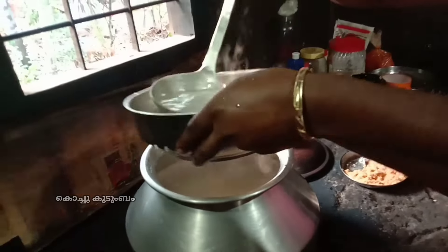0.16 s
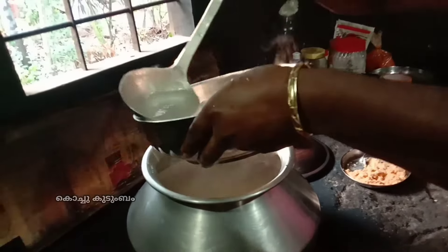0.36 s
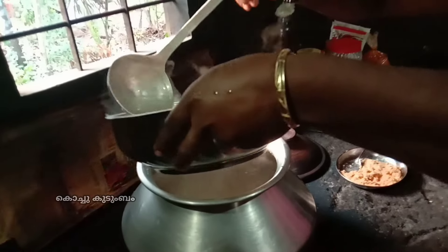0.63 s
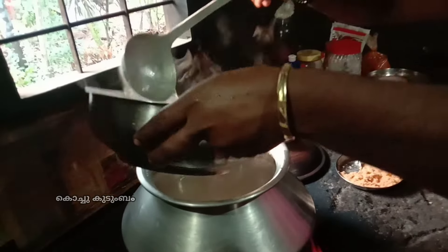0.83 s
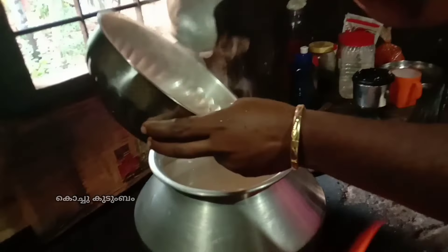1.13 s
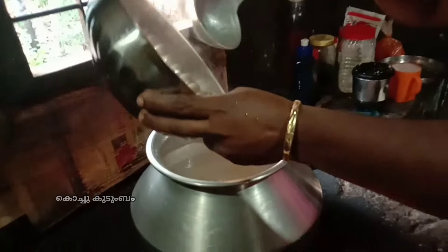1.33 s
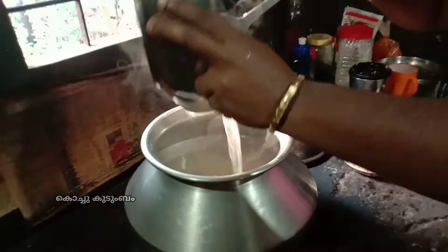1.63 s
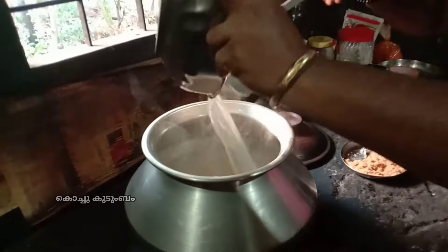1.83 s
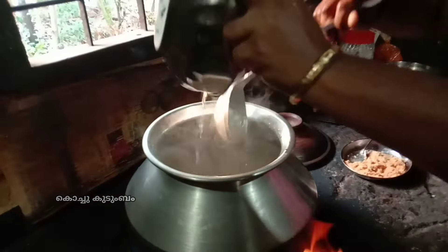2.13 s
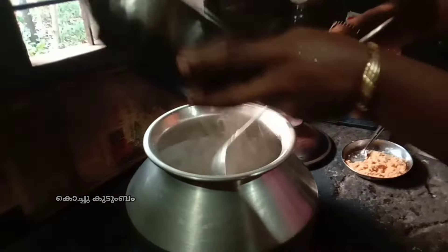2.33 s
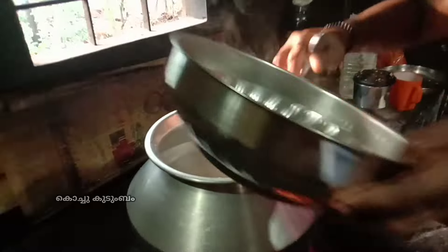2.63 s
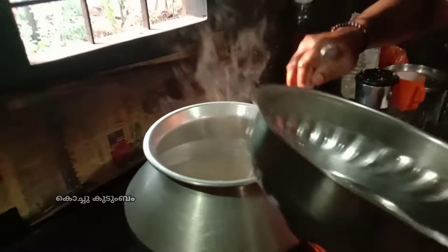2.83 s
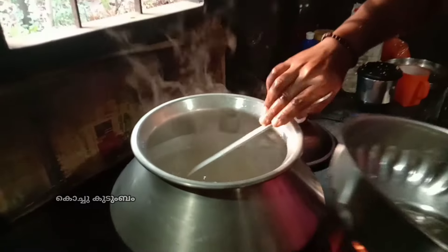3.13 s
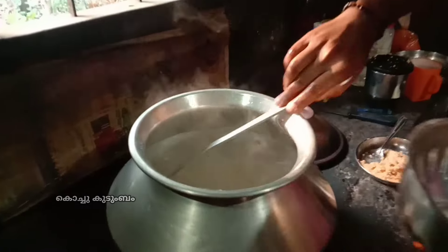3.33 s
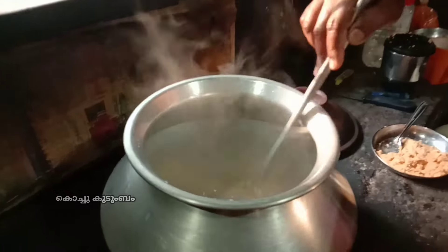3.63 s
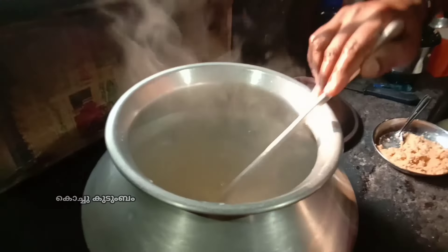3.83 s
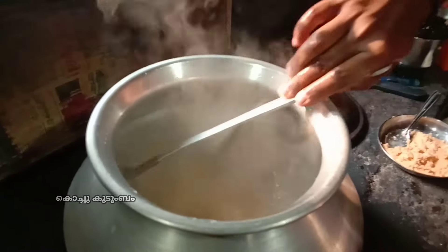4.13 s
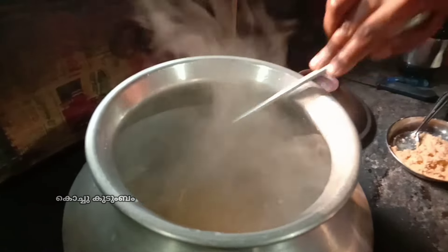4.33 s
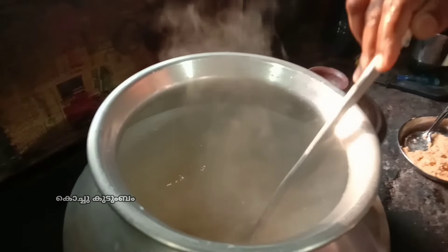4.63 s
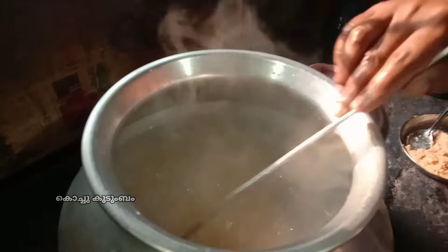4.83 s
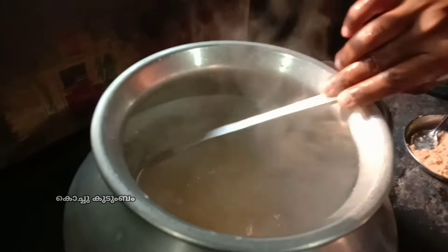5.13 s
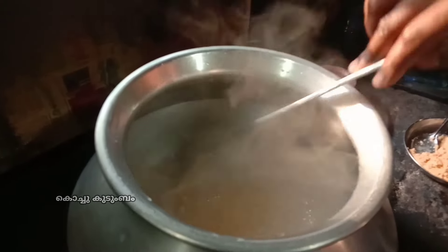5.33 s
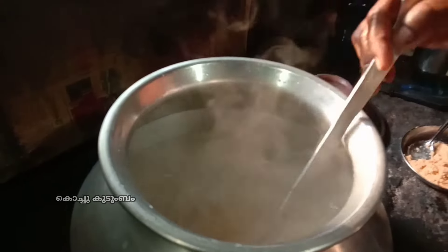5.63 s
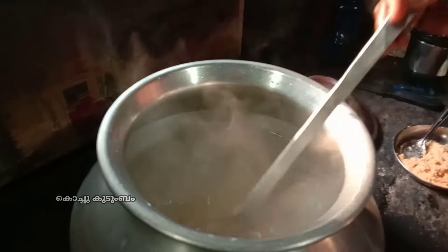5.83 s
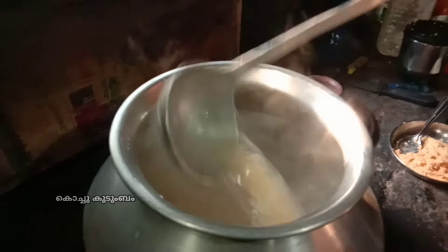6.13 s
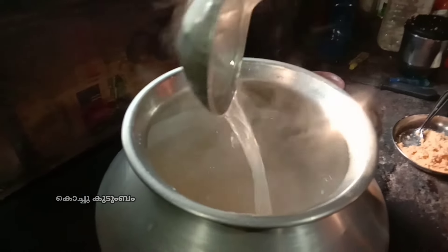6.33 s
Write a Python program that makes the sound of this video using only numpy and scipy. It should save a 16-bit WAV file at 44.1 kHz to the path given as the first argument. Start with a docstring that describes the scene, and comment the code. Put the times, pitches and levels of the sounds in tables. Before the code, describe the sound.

In a small kitchen, poured water splashes into a hollow metal pot, followed by a bright bowl clang and three gritty ladle scrapes through sloshing water.

```python
"""In a small kitchen, water is ladled into a steel bowl and tipped into a big metal pot of rice and hot water.
The bowl clangs as it is drawn away. A long ladle then stirs the pot: it sloshes, knocks on the wall,
scrapes three times round the bottom through the rice, and lifts a scoop that runs back in.
Water is built from swarms of ringing bubbles, random ticks and fine spray; metal from decaying modes
and coloured noise bursts. Echoes inside the pot and the tail of the room surround most layers."""
import sys
import numpy as np
from scipy import signal
from scipy.io import wavfile
from scipy.ndimage import uniform_filter1d, map_coordinates

SR = 44100
rng = np.random.default_rng(int(sys.argv[2]) if len(sys.argv) > 2 else 0)


def digitize_waveform(pressure):
    """Quantize a signal to 16-bit integers and store it at the path in sys.argv[1].

    Rows of a 2-D input are taken as channels; values are limited to [-1, 1].
    """
    field = np.atleast_2d(pressure).T
    bounded = np.clip(field, -1, 1)
    quanta = np.round(bounded * 32767).astype(np.int16)
    wavfile.write(sys.argv[1], SR, quanta)


N = 285327
TIME = np.arange(N) / SR
EMPTIED_S = 1.3  # before this the bowl holds water; after it, water falls in the pot


def amp(db):
    """Decibels to linear gain."""
    return 10 ** (np.asarray(db) / 20)


def evened(x):
    """Scales a sound to unit power."""
    return x / np.sqrt(np.mean(x ** 2) + 1e-20)


def read(points, hz):
    """Reads a curve of (frequency, value) points along a logarithmic frequency axis."""
    f, value = np.transpose(points)
    return np.interp(np.log(hz + 1), np.log(f + 1), value)


def add(mix, start_s, sound):
    """Lays a sound into the mix, cut off at the end."""
    part = mix[max(round(start_s * SR), 0):][:len(sound)]
    part += sound[:len(part)]


def seconds(length):
    """Time axis of a short sound."""
    return np.arange(int(length * SR)) / SR


def through(x, response):
    """Convolves a sound with a response and keeps its length."""
    return signal.fftconvolve(x, response)[:len(x)]


def colour(x, spectrum):
    """Causal minimum-phase filter with the given spectrum."""
    hz = abs(np.fft.fftfreq(4096, 1 / SR))
    log_gain = np.log(amp(read(spectrum, hz)))
    response = np.fft.ifft(np.exp(np.conj(signal.hilbert(log_gain)))).real
    return through(x, response[:2048])


def crest(x):
    """Scales a hit so that its loudest 5 ms have unit power."""
    return x / np.sqrt(uniform_filter1d(x ** 2, size=220).max() + 1e-20)


def steady(x, span):
    """Evens out the slow drift of a texture over span seconds and keeps its grain."""
    window = signal.windows.hann(int(span * SR))
    power = signal.fftconvolve(x ** 2, window, "same") / (span * SR / 2)
    return x / np.sqrt(abs(power) + .02 * np.mean(x ** 2))


def wander(per_s):
    """Smooth random drift of about unit size, through per_s random points a second."""
    knots = rng.standard_normal(int(N / SR * 400))
    return map_coordinates(knots, [TIME * per_s], order=2, mode="mirror")


def ringing(modes):
    """Unit-energy answer of a set of modes to one tap; no mode decays slower than 60 dB in 1 s."""
    t = seconds(1)
    out = 0
    for hz, db, t60 in modes:
        decay = amp(db - 60 * t / min(t60, 1))
        out = out + decay * np.sin(2 * np.pi * (hz * t + rng.random()))
    return out / np.linalg.norm(out)


def patter(per_s, spread_db):
    """Random clicks, most of them small and a few large."""
    out = np.zeros(N)
    at = np.flatnonzero(rng.random(N) < per_s / SR)
    draw = rng.uniform(-1, 1, N)[at]
    out[at] = np.sign(draw) * amp(spread_db * np.minimum(-np.log(abs(draw)), 4))
    return out


def bubble(hz, cycles, rise):
    """A bubble rings for some cycles and climbs in pitch as it nears the surface."""
    life = cycles / hz
    t = seconds(5 * life)
    tone = np.sin(2 * np.pi * hz * (t + rise * t * t / (2 * life)))
    return tone * np.exp(-t / life) * (1 - np.exp(-2 * t * hz))


def bubbles(low_hz, high_hz, per_s, spread_db, cycles, rise, count=36):
    """A swarm of bubbles of all sizes; small, high-pitched ones are more common."""
    pitches = np.geomspace(low_hz, high_hz, count) * rng.uniform(.97, 1.03, count)
    shares = np.sqrt(pitches) / np.sqrt(pitches).sum()
    out = np.zeros(N)
    for hz, share in zip(pitches, shares):
        shape = hz / np.sqrt(share) * bubble(hz, cycles * rng.uniform(.5, 1.5), rise)
        out += signal.oaconvolve(patter(per_s * share, spread_db), shape)[:N]
    return evened(out)


def gesture(start, length, rise_s, fall_db_per_s, depth_db=18, sag_db_per_s=0):
    """Gain of one movement: it swells from depth_db down, holds or sags, then dies away."""
    t = TIME - start
    swell = depth_db * np.maximum(1 - t / rise_s, 0)
    sag = sag_db_per_s * np.maximum(t - rise_s, 0)
    fall = fall_db_per_s * np.maximum(t - length, 0)
    return np.clip(t / .004, 0, 1) * amp(-swell - sag - fall)


def gestures(rows, rise_s, fall_db_per_s, **shape):
    """One gain curve for each dB column of a table of movements; overlaps add in power."""
    gains = []
    for start, length, *dbs in rows:
        gains.append(np.outer(amp(dbs), gesture(start, length, rise_s, fall_db_per_s, **shape)))
    return np.linalg.norm(gains, axis=0)


# Decay of the room's tail: frequency_hz, t60_s
ROOM_DECAY = [(100, 1), (400, 0.23), (1500, 0.48), (4000, 0.34), (8000, 0.44), (15000, 0.052)]


def kitchen(early_t60, early_db, late_db):
    """Direct sound, quick echoes inside the pot and off the near wall, then the tail of the room."""
    t = seconds(.6)
    early, late = rng.standard_normal((2, len(t))) * (rng.random((2, len(t))) < .15)
    early *= amp(-60 * t / early_t60) * (t > .001)
    # the tail dies at its own rate in each frequency band
    hz, at, bands = signal.stft(late * (t > .008), SR, nperseg=256)
    fading = bands * amp(-60 * at / read(ROOM_DECAY, hz)[:, None])
    late = signal.istft(fading, SR, nperseg=256)[1][:len(t)]
    out = amp(early_db) * early / np.linalg.norm(early) + amp(late_db) * late / np.linalg.norm(late)
    out[0] += 1
    return out / np.linalg.norm(out)


def roaming(x, rooms):
    """A source that travels round the pot meets ever different echoes."""
    weights = amp(10 * np.array([wander(per_s=9) for _ in rooms]))
    weights /= np.linalg.norm(weights, axis=0)
    return sum(w * through(x, room) for w, room in zip(weights, rooms))


# Colour of the kitchen's background: frequency_hz, relative_density_db
AIR_COLOUR = [(20, -30), (50, 2.5), (75, -5), (120, 2.5), (180, -12), (400, -6.5), (520, -9), (700, -23),
              (1300, -18.5), (5000, -23.5), (7200, -12), (9000, -29.5), (13000, -45), (15200, -20.5)]


def kitchen_air():
    """Steady noise of the kitchen, coloured by its spectrum."""
    return amp(-55) * evened(colour(rng.standard_normal(N), AIR_COLOUR))


# Dull bumps of the bowl as it is handled: start_s, level_db, pitch_hz
BOWL_BUMPS = [(0.491, -57, 114), (0.894, -51, 111), (1.32, -51, 117), (2.771, -36, 126.5)]


def bumping():
    """A soft blow gives only a short low note."""
    out = np.zeros(N)
    t = seconds(.4)
    for start_s, level_db, pitch_hz in BOWL_BUMPS:
        note = np.sin(2 * np.pi * pitch_hz * t) * t * np.exp(-t / 0.017)
        add(out, start_s, amp(level_db) * crest(note))
    return out


# Colour of fine spray and of the top edge of a hit: frequency_hz, relative_density_db
SPRAY_COLOUR = [(6000, -29.5), (8700, -5), (10500, -3.5), (13500, -13), (15000, 0.5), (16000, 2)]


def mist(room):
    """Fine droplets tick at the top of the range."""
    droplets = patter(per_s=300, spread_db=7.5)
    return steady(through(colour(droplets, SPRAY_COLOUR), room), span=0.11)


# Single drops and slaps of water: start_s, level_db (before the layer trim), starting pitch_hz
WATER_DROPS = [(0.5724, -12, 6100), (0.6406, -17.5, 1810), (0.718, -15, 2310), (0.7553, -16.5, 3110),
               (1.6213, -20.5, 6740), (1.804, -9.5, 2930), (1.8853, -14.5, 4120), (2.0528, -13, 1656),
               (2.0678, -8.5, 2990), (2.319, -24, 7160), (2.4058, -27, 7180), (2.442, -24, 4730),
               (2.4616, -24, 4430), (2.5048, -26.5, 4050), (2.5613, -28.5, 6040), (3.0188, -16, 2400),
               (3.188, -19.5, 1670), (3.923, -11.5, 2400), (3.9655, -11.5, 2920), (4.0345, -15.5, 3660),
               (5.739, -14.5, 5400), (5.7991, -10.5, 5920), (5.9875, -18, 2900), (6.063, -13.5, 6130),
               (6.263, -20, 2330), (6.4502, -7.5, 3870)]
# Colour of splashing water: frequency_hz, relative_density_db
SPLASH_COLOUR = [(150, -23), (450, -9), (700, -14.5), (1000, -13), (1350, -7), (2200, -5), (3100, -2),
                 (4500, -5.5), (6300, -5.5), (7300, 0), (8300, -9), (10000, -22.5), (14000, -40)]


def dripping(room):
    """A drop slaps the surface and leaves one ringing bubble, with a few smaller ones in its wake."""
    out = np.zeros(N)
    t = seconds(.4)
    for start_s, level_db, pitch_hz in WATER_DROPS:
        impact = rng.standard_normal(len(t)) * np.exp(-t / 0.0035)
        drop = crest(colour(impact, SPLASH_COLOUR)) + amp(-17) * crest(colour(impact, SPRAY_COLOUR))
        add(drop, .001, amp(7.0) * crest(bubble(pitch_hz, cycles=13.0, rise=0.019)))
        for delay, ratio in rng.uniform([.003, .75], [.025, 1.25], (3, 2)):
            add(drop, delay, amp(-8.5) * crest(bubble(pitch_hz * ratio, cycles=3.1, rise=0.04)))
        add(out, start_s, amp(level_db) * crest(through(drop, room)))
    return amp(-14) * out


# Big air pockets closing under the surface: start_s, level_db (before trim), nominal pitch_hz
AIR_GULPS = [(0.152, -40.5, 343), (0.239, -28, 315), (1.664, -22.5, 354), (1.82, -27, 374),
             (1.905, -27, 390), (1.939, -25.5, 367), (3.634, -20.5, 370), (3.682, -21.5, 356),
             (4.55, -22, 376), (5.356, -31.5, 365), (5.462, -27, 598), (5.573, -26, 390),
             (5.624, -19.5, 201), (5.737, -19, 555), (5.872, -28, 385)]


def gulping(room):
    """Large pockets of air close with a low plop."""
    out = np.zeros(N)
    for start_s, level_db, pitch_hz in AIR_GULPS:
        # starts just under the nominal pitch and climbs
        plop = bubble(pitch_hz * 0.967, cycles=3.45, rise=0.047)
        add(out, start_s, amp(level_db - 4.0) * crest(signal.fftconvolve(plop, room)))
    return out


# Gushes into the bowl, from the bowl into the pot, and last from the lifted ladle:
# start_s, length_s, splash_db, spray_db
WATER_POURS = [(0.0, 0.07, -55.5, -71), (.15, 0.11, -47, -67), (.235, 0.078, -26, -46),
               (.35, .28, -37, -51), (.635, 0.13, -32.5, -53), (.82, 0.16, -47.5, -58),
               (1.58, .05, -53.5, -72), (1.63, .17, -32, -51), (1.8, 0.17, -28, -41.5),
               (2.0, 0.1, -32.5, -53), (2.32, 0.72, -51.5, -56), (6.06, .07, -39.5, -44),
               (6.26, 0.24, -40, -49)]
# Modes of the bowl with water in it: frequency_hz, level_db, t60_s (the ring is held to 1 s at most)
FULL_BOWL_MODES = [(1340, 6, .12), (1775, -4, 1.5), (1980, 3, .45), (2990, 0, .6)]
# Modes of the pot's rim: frequency_hz, level_db, t60_s (the ring is held to 1 s at most)
POT_RIM_MODES = [(860, 2, .2), (1231, -4, 2.2), (1680, 4, .22)]


def pouring(rooms):
    """The stream breaks into ticks, bubbles and spray, and rings first the bowl, then the pot."""
    splash, spray = gestures(WATER_POURS, rise_s=0.019, fall_db_per_s=131)
    ticks = evened(patter(per_s=700, spread_db=0.0))
    fizz = bubbles(1200, 7500, per_s=1200, spread_db=3.4, cycles=13, rise=.025)
    stream = colour(fizz + amp(-2) * ticks, SPLASH_COLOUR)
    water = splash * steady(roaming(stream, rooms), span=.07)
    # the falling water also drums on the metal beneath it
    drumming = splash * rng.standard_normal(N)
    over_pot = TIME > EMPTIED_S
    bowl = amp(-15.0) * through(drumming * ~over_pot, ringing(FULL_BOWL_MODES))
    rim = amp(-18.5) * through(drumming * over_pot, ringing(POT_RIM_MODES))
    # low bubbles dragged under where the stream plunges into the pot
    deep = bubbles(311.5, 423, per_s=90, spread_db=3, cycles=8, rise=.03, count=8)
    plunge = amp(-22) * splash * over_pot * steady(deep, span=.1)
    return water + spray * mist(rooms[0]) + bowl + rim + plunge


def bowl_ring(modes, room):
    """Thin steel that is not quite round rings in beating pairs of modes, among weaker ones that die sooner."""
    twins = [(hz + rng.uniform(.004, .02) * hz, db, t60) for hz, db, t60 in modes]
    minor = [(hz * rng.uniform(.88, 1.12), db, t60 * .6) for hz, db, t60 in modes * 2]
    ring = ringing(modes) + amp(-4) * ringing(twins) + amp(-3.5) * ringing(minor)
    ring = ring * (1 - np.exp(-seconds(1) / .003))  # softened onset
    return crest(ring + amp(1.5) * through(ring, room))


# Moments the steel bowl is set ringing: start_s, level_db (before trim)
BOWL_CLANGS = [(0.0, -52), (.927, -49), (2.66, -13), (2.907, -49)]
# Modes of the emptied bowl: frequency_hz, level_db, t60_s
EMPTY_BOWL_MODES = [(605, -5.5, 0.6), (1075, -21, 0.32), (1236, -15, 0.95), (1397, -4.5, 0.58),
                    (1717, -6, 0.76), (1910, -4, 0.63), (2104, 0.5, 0.34), (2780, -8, 0.4),
                    (3150, 11.5, 0.31), (3040, 4, 0.37), (3190, -16, 0.44), (3250, -1, 0.33),
                    (3530, -32, 0.25), (3838, -5, 0.44), (4180, -22, 0.4), (4110, -1, 0.27),
                    (4600, -38, 0.19), (4930, 4, 0.21), (5280, -7, 0.36), (5220, -2, 0.23),
                    (5290, 3.5, 0.19), (5700, -4, 0.29), (6670, -9.5, 0.099), (6600, -13, 0.2),
                    (7040, -18, 0.21), (7600, -3, 0.2), (7100, 11.5, 0.14), (7570, -2, 0.16)]


def clanging(room):
    """The bowl rings on after a blow: a few notes while it holds water, many once it is empty."""
    out = np.zeros(N)
    full = bowl_ring(FULL_BOWL_MODES, room)
    empty = bowl_ring(EMPTY_BOWL_MODES, room)
    for start_s, level_db in BOWL_CLANGS:
        add(out, start_s, amp(level_db + 1.5) * (full if start_s < EMPTIED_S else empty))
    return out


# Sweeps of the ladle through the water (boom and gurgle before trim):
# start_s, length_s, wash_db, boom_db, gurgle_db
LADLE_SWEEPS = [(2.67, 0.16, -62, -41, -48), (3.0, 0.093, -32.5, -44.5, -44.5),
                (3.13, 0.15, -38.5, -60, -55), (3.28, 0.56, -32, -41, -43.5),
                (3.73, 0.18, -29, -31.5, -36.5), (3.91, 0.11, -31.5, -43, -40),
                (4.14, 0.46, -28.5, -40, -41.5), (4.62, .21, -28, -37, -39.5), (4.92, 0.2, -29, -35.5, -40),
                (5.3, 0.29, -30.5, -41, -43), (5.56, 0.14, -30.5, -34, -33),
                (5.72, 0.17, -29.5, -48.5, -33), (5.92, .07, -32, -58, -58),
                (6.06, 0.049, -32.5, -69, -45.5), (6.14, 0.23, -45, -72, -56),
                (6.26, 0.15, -38.5, -54, -48)]


def sweeping():
    """Gain curves of the ladle's movement: wash of the water, boom of the hollow, gurgle of the bubbles."""
    return gestures(LADLE_SWEEPS, rise_s=0.016, fall_db_per_s=170)


# Air and water in the pot: frequency_hz, level_db, t60_s
HOLLOW_MODES = [(123.4, 0.5, 0.22), (213, -6, 0.44), (245, -17.5, 0.29)]


def churning(boom, gurgle, room):
    """The moving ladle sounds the hollow of the pot and drags large bubbles under."""
    hollow = steady(through(patter(per_s=130, spread_db=9.5), ringing(HOLLOW_MODES)), span=0.16)
    large = bubbles(279.6, 881, per_s=260, spread_db=5, cycles=4.3, rise=0.039)
    glugs = steady(through(large, room), span=0.1)
    return amp(-4.0) * boom * hollow + amp(-2.5) * gurgle * glugs


# Colour of water lapping in the pot: frequency_hz, relative_density_db
SLOSH_COLOUR = [(400, -7.5), (900, -10), (1250, 0.5), (2100, -4), (3100, 2.5), (4200, -1), (6000, -3.5),
                (7300, -5), (8300, -12.5), (10000, -34), (14000, -37)]


def stirring(wash, rooms, pot):
    """Wavelets lap and grains of rice tick against the metal."""
    ticks = evened(patter(per_s=600, spread_db=5))
    fizz = bubbles(900, 7500, per_s=800, spread_db=4.2, cycles=13, rise=.03)
    lapping = fizz + amp(1.3) * ticks + amp(-13.5) * through(ticks, pot)
    slosh = steady(roaming(colour(lapping, SLOSH_COLOUR), rooms), span=0.043)
    return wash * (slosh + amp(-20.5) * mist(rooms[0]))


# Sharp blows on the bowl or the pot, mostly by the ladle:
# start_s, level_db (before trims), thud_db, body_db, edge_db (these three relative to it), t60_s
LADLE_KNOCKS = [(0.2267, -11, -39, -6, -13.5, 0.17), (0.9296, -30, -24, -31, -39, 0.056),
                (1.666, -15, -35, -15, -9, 0.09), (2.0917, -12.5, -49, -34, -9, 0.15),
                (2.6611, -11.5, -25.5, -2.5, -5.5, 0.22), (2.906, -14.5, -26, -10, -12, 0.22),
                (3.2749, -19, -16, 0.5, -47, 0.084), (3.4653, -7, -31, -10, -11.5, 0.12),
                (3.63, -15.5, -11, -0.5, -39, 0.12), (3.7614, -8.5, -27, -2.5, -41, 0.083),
                (4.1327, -8, -23, -4, -45, 0.14), (4.3582, -7.5, -31.5, -11, -14.5, 0.1),
                (4.5562, -12, -19.5, -22, -38, 0.11), (4.8839, -9, -25, -7.5, -38, 0.13),
                (4.9425, -6.5, -29, -10.5, -37, 0.1), (5.0, -7.5, -18.5, 0.5, -42, 0.11),
                (5.0872, -10, -29, -15, -42, 0.077), (5.4619, -12, -19.5, -27, -14, 0.24),
                (5.6041, -9.5, -15, -8, -43, 0.14)]
# Low, middle and high colours of a knock: frequency_hz, relative_density_db
THUD_COLOUR = [(60, -60), (130, 14.5), (380, 14), (600, 10), (1000, -42), (2000, -54)]
BODY_COLOUR = [(300, -27), (750, -1.5), (1300, 7), (2000, 7.5), (3000, -5), (6000, -59.5)]
RING_COLOUR = [(1000, -46.5), (2300, 1.5), (3200, 9), (4200, 6.5), (6000, 5.5), (7400, 5), (8500, -13.5),
               (12000, -34)]


def knocking(room, pot):
    """Each blow crashes through the dense high modes of the shell; the ladle chatters briefly after it."""
    out = np.zeros(N)
    t = seconds(.5)
    for start_s, level_db, thud_db, body_db, edge_db, t60_s in LADLE_KNOCKS:
        # the first contact, then a weaker rebound 7 to 8 ms later
        rebound = t - rng.uniform(0.0067, 0.0084)
        force = amp(-60 * t / t60_s) + 0.22 * (rebound > 0) * amp(-60 * abs(rebound) / 0.014)
        shell = (force + amp(-4.5) * np.exp(-t / 0.0019)) * rng.standard_normal(len(t))
        shell = shell + amp(-8) * through(shell, pot)
        shell = shell + amp(-4.5) * through(shell, room)
        parts = [(THUD_COLOUR, thud_db + 5.5), (BODY_COLOUR, body_db - 5.0),
                 (RING_COLOUR, -.3), (SPRAY_COLOUR, edge_db)]
        for spectrum, part_db in parts:
            add(out, start_s, amp(level_db + part_db) * crest(colour(shell, spectrum)))
    return amp(-4.5) * out


# Strokes of the ladle over the bottom: start_s, length_s, grit_db, groan_db (before trims)
LADLE_SCRAPES = [(3.29, 0.39, -19, -32), (4.18, 0.4, -17, -29.5), (5.15, 0.312, -16, -28)]
# Wall and bottom of the filled pot: frequency_hz, level_db, t60_s
POT_MODES = [(816, 1, 0.12), (1249, 5.5, 0.1), (1271.3, 5, 0.13), (2256, -3, 0.035), (2890, -14, 0.12),
             (3042, 0, 0.067), (3190, -6, 0.096), (3460, -27, 0.15), (3673, -2.5, 0.1), (4097, 0.5, 0.022),
             (4170, 2, 0.049), (4930, -8.5, 0.116), (4950, -17, 0.13), (5700, -27.5, 0.113),
             (6800, -20, 0.055)]
# Colours of the gritty edge and of the groaning bottom: frequency_hz, relative_density_db
GRIT_COLOUR = [(1000, -38.5), (1550, -4.5), (2300, -2.5), (3300, 5.5), (4300, 0.5), (6000, -1.5),
               (7300, -3), (8300, -18), (10000, -27), (13000, -44), (15000, -37)]
GROAN_COLOUR = [(150, -47), (400, -20.5), (800, -12.5), (1000, -10.5), (1250, -8.5), (1600, -11.5),
                (2300, -44)]


def scraping(rooms):
    """The ladle's edge slips in clumps of tiny jerks; as it travels, the pot's modes swell and fade in turn."""
    # the edge bites into the rice first; the bottom groans once the hand bears down
    bite_s, bear_down_s = 0.11, 0.18
    stroke = dict(fall_db_per_s=400, sag_db_per_s=9.5)
    grit = gestures(LADLE_SCRAPES, bite_s, depth_db=15, **stroke)[0]
    groan = gestures(LADLE_SCRAPES, bear_down_s, depth_db=24, **stroke)[1]
    slips = evened(patter(per_s=1700, spread_db=3) * amp(2.8 * wander(per_s=130)))
    wall = np.zeros(N)
    for hz, db, t60 in POT_MODES:
        swell_db = 4 * wander(per_s=14)
        # a lone mode is scaled to unit energy, so its level is set here
        wall += amp(db + swell_db) * through(slips, ringing([(hz, db, t60)]))
    metal = roaming(amp(6.5) * slips + evened(wall), rooms)
    gritty = steady(colour(metal, GRIT_COLOUR), span=0.07)
    groaning = steady(colour(metal, GROAN_COLOUR), span=0.49)
    return amp(-2.0) * grit * gritty + amp(3.5) * groan * groaning


def scene():
    """Kitchen air, then all the water and all the metal through a low cut."""
    rooms = [kitchen(early_t60=0.067, early_db=7.5, late_db=-2.0) for _ in range(4)]
    room, pot = rooms[0], ringing(POT_MODES)
    wash, boom, gurgle = sweeping()
    water = dripping(room) + gulping(room) + pouring(rooms)
    water += churning(boom, gurgle, room) + stirring(wash, rooms, pot)
    metal = bumping() + clanging(room) + knocking(room, pot) + scraping(rooms)
    # a low cut at 95 Hz keeps rumble out of the water and metal
    low_cut = signal.butter(3, 95, "high", fs=SR, output="sos")
    return (kitchen_air() + signal.sosfilt(low_cut, water + metal))[None]


def record(dry):
    """The loudest peaks are rounded off below a ceiling; then the band limit."""
    ceiling, edge_hz = .8, 15650
    held = dry / (1 + (dry / ceiling) ** 4) ** .25
    band_limit = signal.firwin(511, edge_hz, window=("kaiser", 9), fs=SR)
    return signal.oaconvolve(held, band_limit[None], "same")


dry = scene()
out = record(dry)
digitize_waveform(out)
```